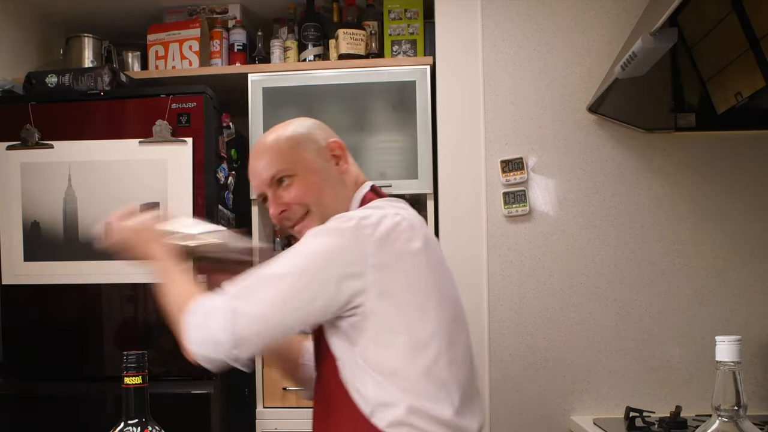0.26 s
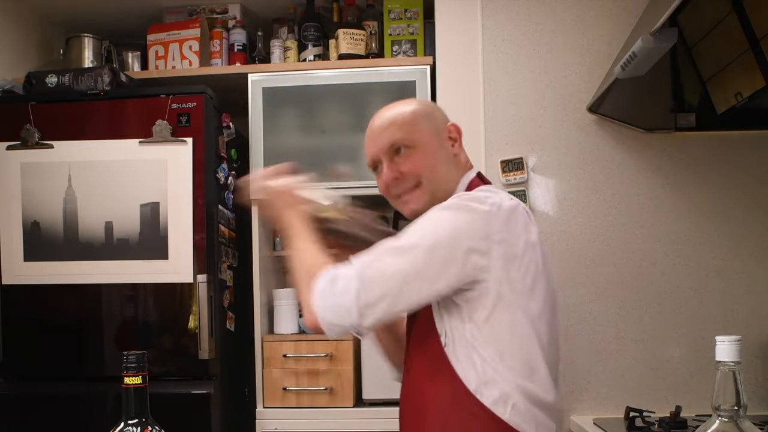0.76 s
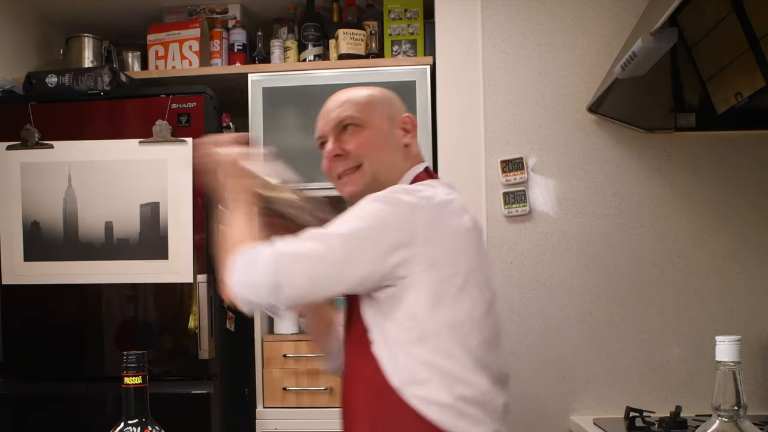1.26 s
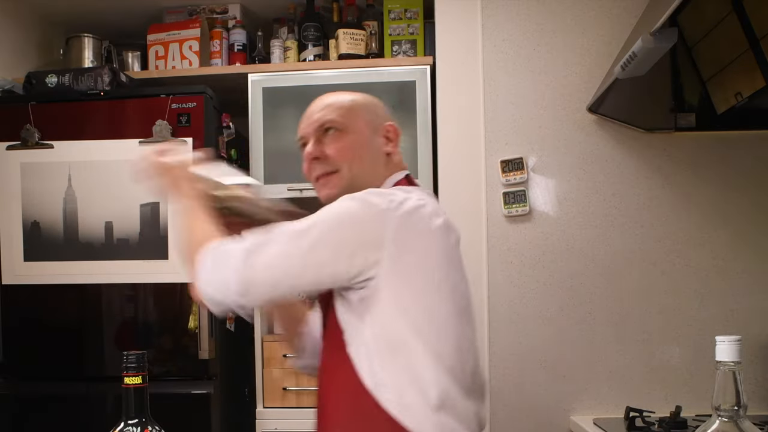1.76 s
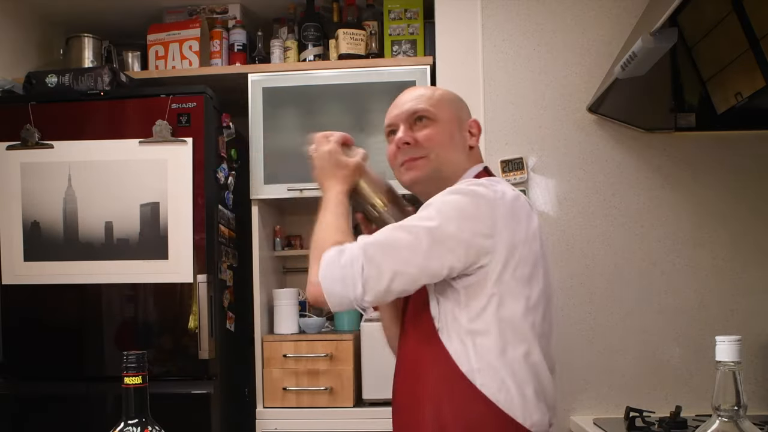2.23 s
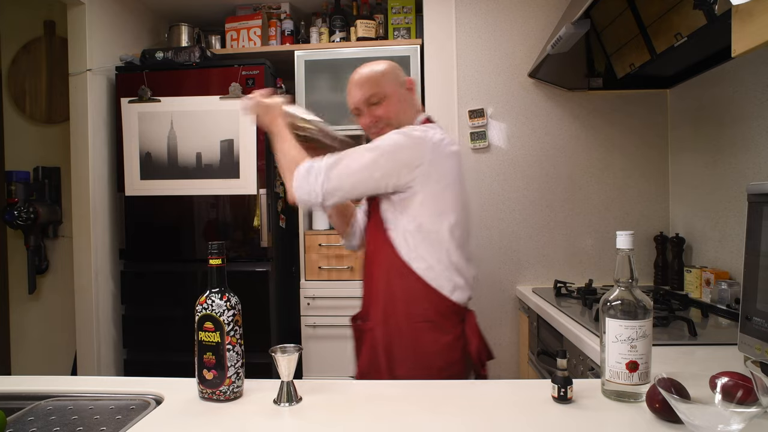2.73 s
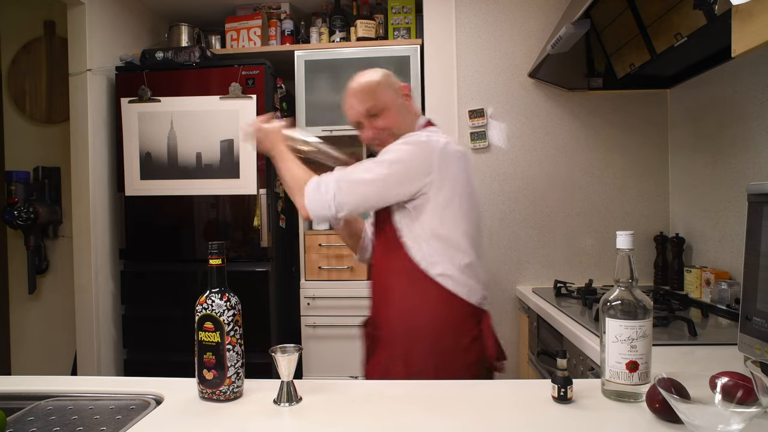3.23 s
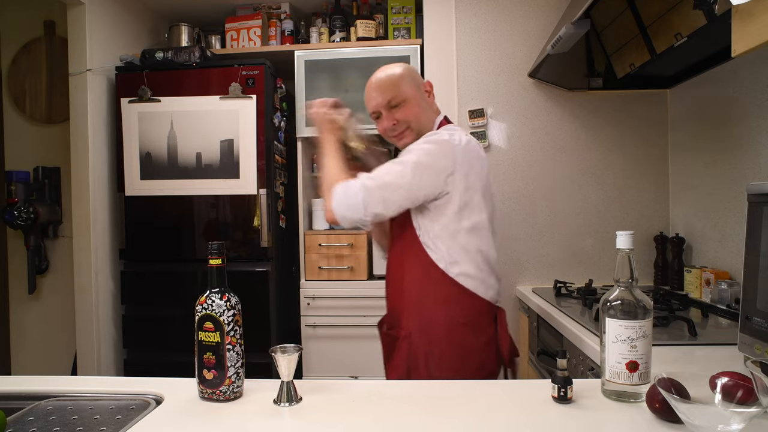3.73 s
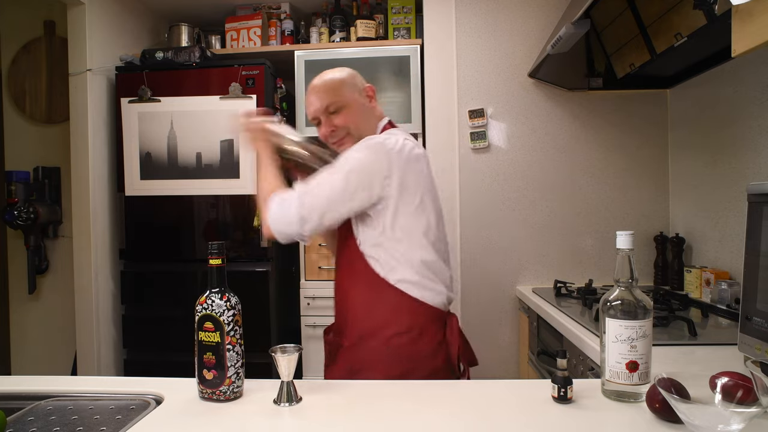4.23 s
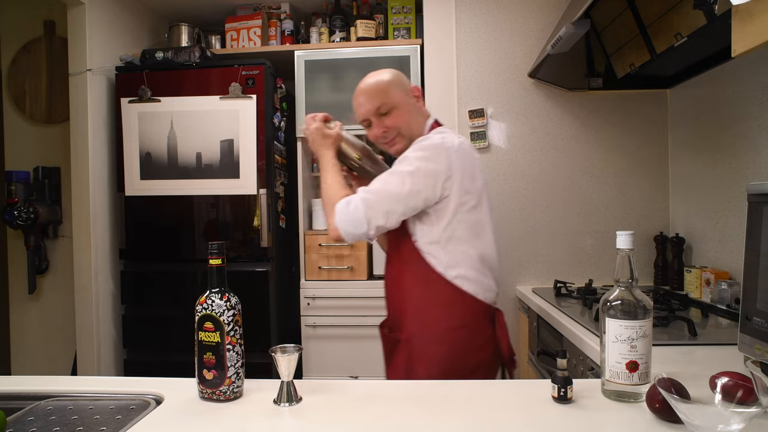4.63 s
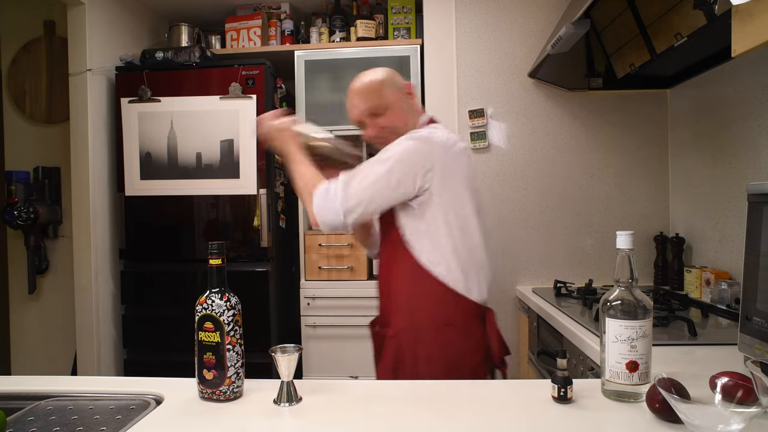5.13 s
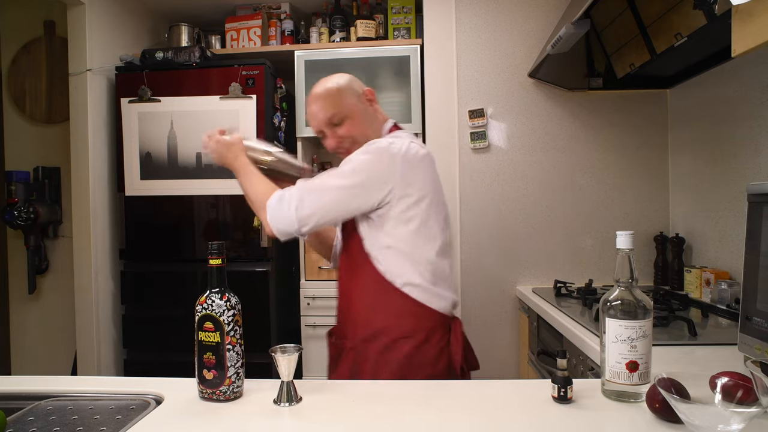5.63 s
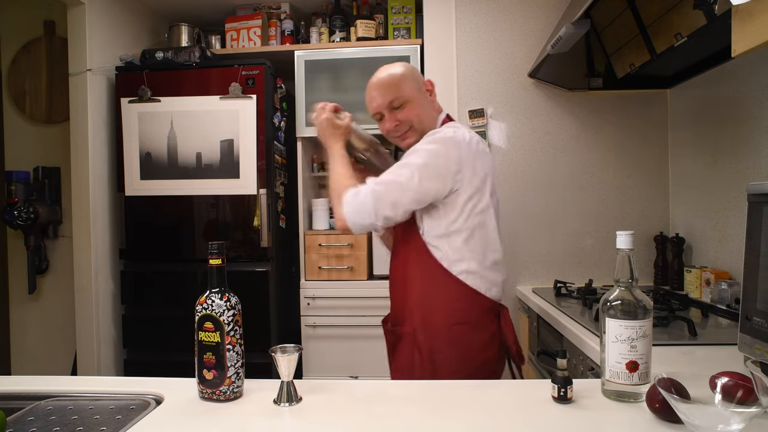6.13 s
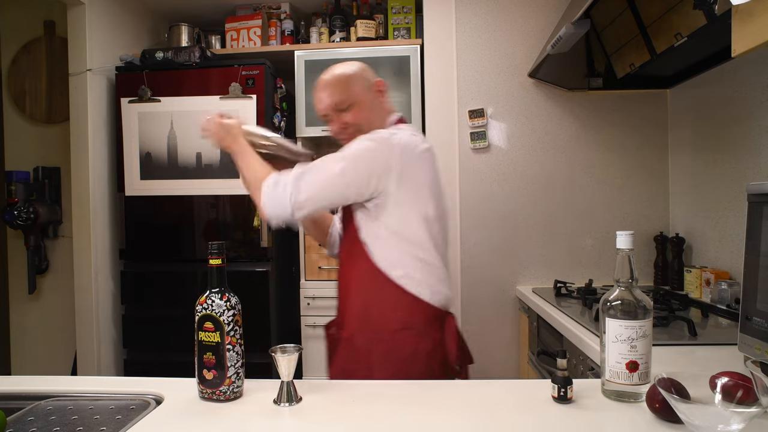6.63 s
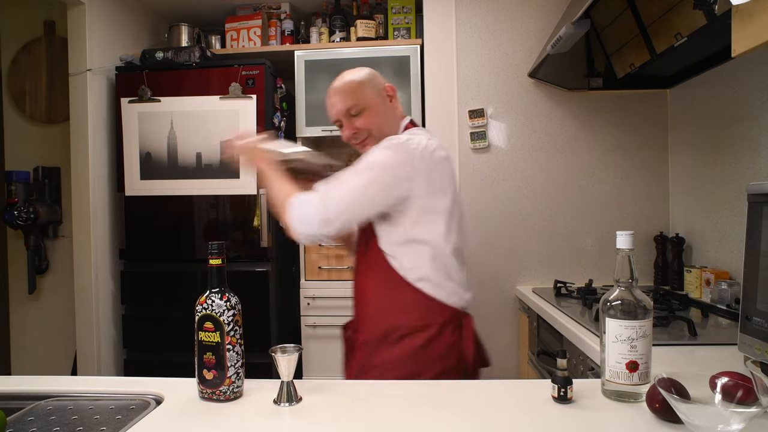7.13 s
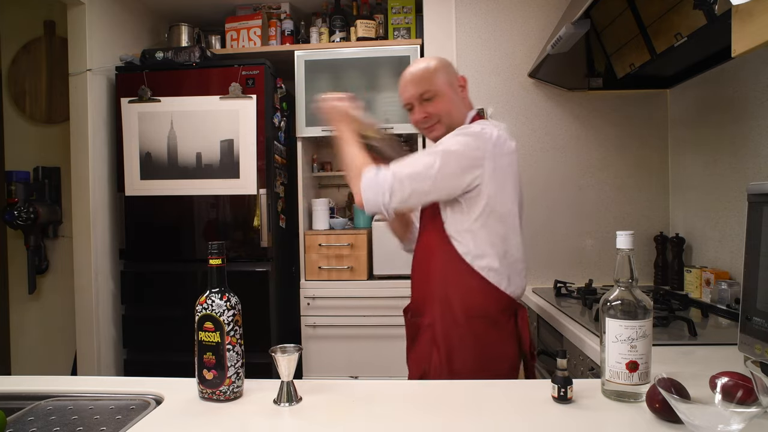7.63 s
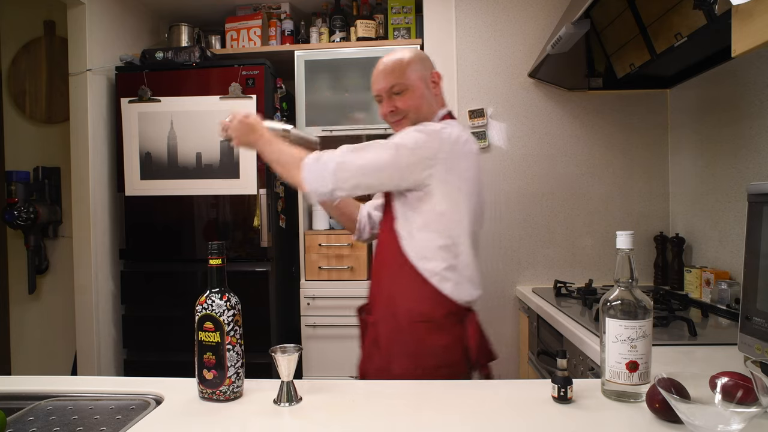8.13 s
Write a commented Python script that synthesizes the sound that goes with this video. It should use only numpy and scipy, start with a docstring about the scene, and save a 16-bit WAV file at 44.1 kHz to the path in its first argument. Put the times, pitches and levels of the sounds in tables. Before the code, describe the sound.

Rapid metallic ice rattle begins at once with a sharp knock. Cubes and liquid crash from end to end of a steel tin in a dense, steady rhythm, with bright cracks, short rings and small wet gurgles. Later the strokes grow lighter, drier and irregular, then slower, and the sound cuts off. Fairly close microphone, loud and slightly saturated, small kitchen with a brief reverberation and faint low room noise.

```python
"""A small kitchen: a steel cocktail shaker full of ice and liquid is shaken hard, slowing near the end.
About ten times a second the pack of cubes slams into one end of the tin: grainy noise driving steel resonances.
Stray cubes crack and ring between slams; clinks and hollow gurgles are short tones, and short dull low bumps
lie under some slams. The bass is fuller early and thins towards the end. Decaying noise gives the room's
reflections, and the loudest peaks are rounded off softly at a ceiling."""
import sys
import numpy as np
from scipy import signal
from scipy.fft import rfft, irfft
from scipy.io import wavfile
from scipy.ndimage import uniform_filter1d

SR = 44100
rng = np.random.default_rng(int(sys.argv[2]) if len(sys.argv) > 2 else 0)


def store_pcm(level_fs):
    """Save levels as 16-bit WAV."""
    pcm = np.round(np.clip(level_fs, -1, 1) * 32767).astype(np.int16)
    wavfile.write(sys.argv[1], SR, np.atleast_2d(pcm).T)


N = 369116
TIME = np.arange(N) / SR  # seconds

# the ice pack reaches an end of the tin:
# (time [s], time to full force [s], relative level [dB], treble over bass [dB])
SLAMS = [(0.024, 0.011, -10.5, 7.5), (0.114, 0.017, -10.5, 1), (0.281, 0.0084, -10, -1),
         (0.373, 0.015, -15.5, -5), (0.495, 0.014, -19, 2), (0.601, 0.016, -11, -5), (0.73, 0.019, -11, -1),
         (0.824, 0.012, -5, 1.5), (0.935, 0.012, -7.5, -1.5), (1.045, 0.011, -6.0, -1),
         (1.136, 0.023, -10, -2.5), (1.242, 0.018, -11, -3), (1.343, 0.024, -9.5, -2),
         (1.451, 0.0092, -6.0, -1.5), (1.552, 0.018, -10.5, 3.5), (1.653, 0.011, -7, -5.5),
         (1.761, 0.022, -8.5, -0.5), (1.838, 0.013, -7, -2), (1.927, 0.024, -11, 1), (2.04, 0.011, -6, 1.5),
         (2.144, 0.02, -8, 0), (2.236, 0.015, -9, -1), (2.335, 0.014, -7.5, 2.5), (2.426, 0.017, -8, -1.5),
         (2.547, 0.0073, -5.5, -0.5), (2.607, 0.024, -13.5, -3), (2.713, 0.022, -9, 0),
         (2.812, 0.016, -9, -4), (2.912, 0.014, -10.0, 4), (2.987, 0.016, -12, -2),
         (3.091, 0.013, -11.5, 9), (3.177, 0.012, -11.0, -7), (3.275, 0.014, -9.5, 1),
         (3.36, 0.03, -16, -1), (3.463, 0.013, -14, 10), (3.551, 0.011, -10.5, -7),
         (3.614, 0.022, -10.5, 3), (3.74, 0.011, -9.5, -3), (3.808, 0.025, -16, 9),
         (3.921, 0.031, -13.5, 1), (4.024, 0.014, -10.0, 2), (4.109, 0.011, -10, -5.5),
         (4.18, 0.021, -13.0, 0), (4.285, 0.012, -16, -8), (4.35, 0.0078, -12, 2.5), (4.387, 0.012, -12, 2),
         (4.469, 0.0079, -10.5, -9), (4.541, 0.017, -9.5, 2.5), (4.619, 0.016, -11.5, 1),
         (4.749, 0.02, -10, -1), (4.839, 0.009, -10.5, -4), (4.935, 0.0087, -6, 5),
         (5.029, 0.011, -13.0, -8), (5.098, 0.02, -12.5, -1), (5.191, 0.023, -12.5, 0.5),
         (5.297, 0.02, -14, 11), (5.399, 0.0081, -11.5, -9), (5.578, 0.016, -15, -5),
         (5.685, 0.007, -12, -3), (5.775, 0.03, -26, 6), (5.864, 0.0085, -10, -2), (6.056, 0.0064, -9.5, 4),
         (6.124, 0.0075, -12, -5), (6.235, 0.013, -9.5, 2), (6.342, 0.029, -15.5, -1),
         (6.412, 0.018, -12, 3), (6.515, 0.016, -12.0, 0), (6.609, 0.026, -12.5, 3.5),
         (6.714, 0.013, -11.5, -4), (6.83, 0.019, -13, 4.5), (6.935, 0.012, -9.5, 0.5),
         (7.069, 0.019, -11, -2), (7.158, 0.029, -12, -4.5), (7.32, 0.016, -11, -3.5),
         (7.462, 0.018, -7, -3.5), (7.614, 0.036, -14, -2), (7.815, 0.024, -11.5, -3.5),
         (7.982, 0.038, -18, 3), (8.047, 0.012, -10.5, -3.5), (8.242, 0.023, -13.5, -2.5)]
# resonances of the filled tin: (frequency [Hz], width [Hz], lift in power over the broad colour [dB])
TIN_MODES = [(282, 31, 8), (401.5, 11, 7), (470, 9.1, 1.5), (626, 10, 2.5), (666, 40, 2.5), (838, 51, -1),
             (1380, 160, 2), (1401, 30, 4), (1466, 40, 0), (1890, 24, 4), (2732, 97, 5.5), (2910, 140, 5),
             (3250, 51, 5), (3390, 104, 4.5), (4900, 380, 1.5), (6000, 250, 1)]


def from_db(db):
    """Decibels to gain."""
    return 10 ** (np.asarray(db) / 20)


def at_hz(points, hz):
    """Read a table on a log-frequency axis."""
    f, value = np.transpose(points)
    return np.interp(np.log(np.maximum(hz, 1)), np.log(f), value)


def at_time(points):
    """Draw a (time, level) table as a line over the whole scene."""
    return np.interp(TIME, *np.transpose(points))


def band(x, low, high):
    """Gentle causal band-pass."""
    sos = signal.butter(2, [low, high], "band", fs=SR, output="sos")
    return signal.sosfilt(sos, x + 1e-18)


def add(track, s, sound):
    """Mix a sound into a track from time s on."""
    start = int(np.clip(s * SR, 0, N - 1))
    track[..., start:start + sound.shape[-1]] += sound[..., :N - start]


def shaped(x, spectrum, modes=(), size=8192):
    """Causal (minimum-phase) filter: a broad spectrum with ringing resonances on top."""
    hz = np.arange(size // 2 + 1) * SR / size
    lift = 1
    for f, width, db in modes:
        lift = lift + (from_db(db) ** 2 - 1) / (1 + (2 * (hz - f) / width) ** 2)
    magnitude = from_db(at_hz(spectrum, hz)) * np.sqrt(np.maximum(lift, .1))
    # folding the cepstrum forward makes the filter minimum-phase
    cepstrum = irfft(np.log(magnitude))
    cepstrum[1:size // 2] *= 2
    cepstrum[size // 2 + 1:] = 0
    impulse = irfft(np.exp(rfft(cepstrum)))
    return signal.oaconvolve(x, impulse)[:N]


def swell(t, rise_s, attack=1, fall=1):
    """Rises to 1 in rise_s, then dies away; a small attack starts abruptly, a large fall ends quickly."""
    u = t / max(rise_s, 1e-3)
    return (u * np.exp((1 - u ** fall) / fall)) ** attack


def tone(hz, rise_s, glide=0):
    """A short ring that swells, dies and may glide in pitch (share of the pitch per s)."""
    t = TIME[:SR // 6]
    return swell(t, rise_s) * np.sin(2 * np.pi * hz * (t + glide * t ** 2 / 2))


def partials(hz, spread, t, count):
    """A few close, beating partials around one pitch; rms 1."""
    detune = spread * np.linspace(-1, 1, count) * rng.uniform(0.3, 1, count)
    cycles = np.outer(hz * (1 + detune), t) + rng.random()
    return np.sin(2 * np.pi * cycles).sum(axis=0) * np.sqrt(2 / count)


def room_noise(level_db):
    """Faint low noise of the room, independent left and right."""
    return from_db(level_db) * band(rng.standard_normal((2, N)), 23, 210)


def pack_power(attack, fall):
    """Power of the slosh and of the crunch: every slam swells and dies over the loose tumbling."""
    # cubes tumbling between the slams: (time [s], relative level [dB])
    tumble_levels = [(0.0, -18), (0.22, -26), (0.33, -20.5), (0.69, -21.5), (1.3, -18.5), (3.0, -16.5),
                     (4.0, -19), (5.0, -15), (6.9, -17.5), (7.4, -22), (7.95, -28), (8.37, -26)]
    lift_db, lead_s, lift_s = 1, 0.028, np.pi * 0.014  # the tumbling swells slightly around each slam
    lift, slams = np.zeros(N), np.zeros((2, N))
    for s, rise_s, db, tilt_db in SLAMS:
        gains = from_db([db - tilt_db / 2, db + tilt_db / 2])  # slosh, crunch
        force = swell(TIME[:SR // 4], rise_s, attack, fall)
        add(slams, s, np.outer(gains, force) ** 2)
        add(lift, s - lead_s, np.hanning(int(lift_s * SR)))
    tumbling = from_db(at_time(tumble_levels) + lift_db * lift) ** 2
    return slams + tumbling


def contacts(per_s, spread_db, contact_s, share_s, grit):
    """Power of many brief cube contacts, mean near 1; cubes that land together share the pack's momentum."""
    strength = from_db(spread_db * rng.standard_normal(N)) ** 2
    hits = (rng.random(N) < per_s / SR) * strength
    keep = np.exp(-1 / (contact_s * SR))
    power = signal.lfilter([1 - keep], [1, -keep], hits + 1e-9)
    power /= np.maximum(uniform_filter1d(power, int(share_s * SR)), 1e-9)
    return (power + grit) / (1 + grit)  # grit is a steady share under the single contacts


def strike_points(spread_db, hold_s):
    """Cubes land on ever new spots, so each group of modes is driven by a changing share; rms near 1."""
    draws = rng.standard_normal(N // 32)
    gain = from_db(spread_db * np.clip(draws, -2, 2))
    gain = gain / np.sqrt(np.mean(gain ** 2))
    return np.interp(TIME / hold_s, np.arange(len(gain)), gain)


def excitation(pack, cracks, grain, treble_hz, hardening):
    """Contact forces as noise in narrow bands, mid and side, following the power of pack and cracks."""
    # a slam's tilt runs from the hollow slosh up to the crunch of the ice: pitch of each [Hz]
    register_hz = [1000, 4500]
    edges = np.r_[40, np.geomspace(450, 19000, 16)]  # Hz
    white = rng.standard_normal((2, 2, N))  # neighbouring bands take turns between two mid/side pairs
    drive = 0
    # harder contacts are shorter, so they reach further into the treble
    crunch = pack[-1]
    hardness = np.minimum(crunch / crunch.mean(), 4) ** hardening
    for k, (low, high) in enumerate(zip(edges, edges[1:])):
        hz = np.sqrt(low * high)
        treble = hz > treble_hz
        shares = np.array([at_hz(list(zip(register_hz, row)), hz) for row in np.eye(len(register_hz))])
        power = shares @ pack * grain * (hardness if treble else 1) + cracks
        # the dense treble modes depend less on where a cube lands
        spots = strike_points(spread_db=1.5 if treble else 3.2, hold_s=.007)
        drive = drive + band(np.sqrt(power) * spots * white[k % 2], low, high)
    return drive


def with_bass(x, bass_hz):
    """The bass is fuller early and thins towards the end: a low-passed copy is mixed in or taken out."""
    # fullness of the bass: (time [s], gain of the bass [dB])
    bass_levels = [(0, 10), (1.5, 4.5), (3.5, 6.5), (5.5, 1), (6.8, 0.5), (8.3, -7.5)]
    bass = signal.sosfilt(signal.butter(1, bass_hz, fs=SR, output="sos"), x)
    return x + bass * (from_db(at_time(bass_levels)) - 1)


def tin(drive, count=3):
    """The steel's resonances shift at random as more or less liquid lies against the wall."""
    # broad colour of ice on steel: (frequency [Hz], level [dB])
    steel_colour = [(40, -30), (75, -31), (130, -25), (200, -24), (340, -20), (520, -8.5), (720, -3),
                    (1100, 1), (1350, 3.5), (2200, 0.5), (3100, 2), (3900, -2), (5300, 3), (7800, -6),
                    (10800, -7.5), (13500, -17), (15500, -35.5)]
    swing, hold_s = 0.012, 0.08  # shift either way (share of pitch), time between draws (s)
    load = rng.integers(0, count, N // 64)[(TIME / hold_s).astype(int)]
    out = 0
    for k, shift in enumerate(1 + swing * np.linspace(-1, 1, count)):
        modes = [(hz * shift, width, db) for hz, width, db in TIN_MODES]
        # only new blows meet the new load; earlier rings die at their own pitch
        out = out + np.array([shaped(d * (load == k), steel_colour, modes) for d in drive])
    return out


def shaker(pack_db, knock_db):
    """Contacts drive the tin with independent mid and side noise; rings and tones join the mid."""
    # the loudest single cubes hit the steel: (time [s], relative level [dB], ring [Hz])
    loud_knocks = [(0.0315, 0.5, 2920), (0.0462, -11, 3100), (0.1275, -1, 9130), (0.272, -6, 5160),
                   (0.2935, -11, 1410), (0.3015, -8, 2900), (0.338, -14, 4940), (0.354, -10, 3030),
                   (0.4506, -6, 3070), (0.4987, -3, 5010), (0.5173, -1.5, 3250), (0.568, -8, 2350),
                   (0.59, -14, 5700), (0.6053, 0.5, 2890), (0.7338, -0.5, 9100), (0.7574, -5.5, 1380),
                   (0.8282, -15, 2800), (0.9283, -15, 3080), (0.9451, -5, 3060), (1.0497, 0.5, 3100),
                   (1.0702, 0.5, 1370), (1.1415, 3, 2710), (1.2576, -0.5, 3320), (1.2723, 2.5, 1436),
                   (1.3478, -5.5, 3110), (1.405, -5, 1400), (1.4536, -5, 1390), (1.4752, -1.5, 1415),
                   (1.527, -9, 2900), (1.5581, -4, 3480), (1.6424, -10, 2610), (1.8076, -3.5, 2220),
                   (1.8688, -1, 2960), (1.9631, 1.5, 2580), (2.149, -1, 3170), (2.241, -2.5, 4580),
                   (2.3375, -6, 4940), (2.429, -6, 1300), (2.5475, -9, 1330), (2.6255, -5, 3100),
                   (2.6657, -4, 2970), (2.847, -4, 3020), (2.9158, -8, 1410), (2.9435, -3, 1440),
                   (2.9916, -2, 2800), (3.0944, -1, 2750), (3.3687, -2.5, 3310), (3.3833, -5, 3340),
                   (3.4351, -3, 2630), (3.4682, 1, 5830), (3.5694, -0.5, 2790), (3.6716, -1, 1470),
                   (3.7595, -7, 2010), (3.791, -3, 3200), (3.811, -6, 5800), (3.8345, 1, 5180),
                   (3.8542, 1.5, 5270), (3.9542, -2, 3380), (3.9929, -3.5, 2770), (4.0308, -5, 2110),
                   (4.116, -4, 2780), (4.1568, -2.5, 2880), (4.2178, -4.5, 2940), (4.575, -1, 5460),
                   (4.9068, -3.5, 2630), (5.1055, -6, 3270), (5.3125, -4, 2800), (5.508, -4, 2900),
                   (5.6497, -6, 5500), (5.787, -5, 2730), (5.819, -1, 2225), (6.0133, -3, 4880),
                   (6.1275, -1, 2830), (6.2522, -8, 1450), (6.5202, -4, 4830), (6.6145, -4, 3370),
                   (6.6466, 0, 4720), (6.7323, -5, 1590), (6.8358, -4, 3030), (6.8672, -5.5, 4880),
                   (7.164, -8, 2850), (7.2115, -8, 1940), (7.294, -9, 1385), (7.339, -7, 5200),
                   (7.3641, -5.5, 3300), (7.428, -5, 2890), (7.5891, -6.5, 3280), (7.678, -11, 1400),
                   (7.8556, -6.5, 3120), (8.0663, 0.5, 4990)]
    pack = from_db(pack_db) ** 2 * pack_power(attack=0.32, fall=1.735)
    grain = contacts(per_s=600, spread_db=2.0, contact_s=0.00038, share_s=0.0129, grit=1.0)
    singing = clinks(level_db=12, light_db=-15, scatter_db=8.5, rise_s=0.0053, above_hz=1100, detune=0.049)
    hollow = gurgles(gulp_db=10, gulp_rise_s=0.0068, level_db=-16.5, low_hz=560, high_hz=1030,
                     rise_s=0.0048, glide=2.9)
    cracks, rings = knocks(list(loud_knocks) + strays(pack[-1]), crack_s=0.00048, chip_s=0.006,
                           chip_db=-6.0, ring_t60=0.06, ring_db=-7.0, spread=0.0534)
    cracks = from_db(knock_db) ** 2 * cracks
    drive = excitation(pack, cracks, grain, treble_hz=7000, hardening=0.1)
    mid, side = tin(with_bass(drive, bass_hz=460))
    return np.array([mid + rings + singing + hollow, side])


def kitchen(x, wet_db, first_s):
    """Diffuse reflections from cupboards and walls as decaying noise, dying soonest in the middle range."""
    # kitchen reverberation: (frequency [Hz], time to fall by 60 dB [s])
    decay_times = [(200, 0.46), (1400, 0.17), (5000, 0.17), (14000, 0.44)]
    t, edges = TIME[:SR // 2], np.geomspace(60, 18000, 9)
    tail = 0
    for low, high in zip(edges, edges[1:]):
        t60 = at_hz(decay_times, np.sqrt(low * high))
        tail = tail + band(rng.standard_normal((2, len(t))), low, high) * from_db(-60 * t / t60)
    tail = tail * np.clip(t / first_s - 1, 0, 1)  # silent until first_s, full at twice that
    tail /= np.sqrt(np.sum(tail ** 2, axis=1, keepdims=True))
    return from_db(wet_db) * signal.oaconvolve(x, tail, axes=1)[:, :N]


def clinks(level_db, light_db, scatter_db, rise_s, above_hz, detune, count=2):
    """Clear clinks, and lighter ones that each slam draws from the tin's upper resonances."""
    # the clearest clinks, where a cube or the steel sings on: (time [s], relative level [dB], pitch [Hz])
    clear_clinks = [(1.237, -19.5, 1396), (1.465, -15.5, 1397), (1.838, -20, 1905), (1.948, -19, 3410),
                    (2.34, -17, 5060), (2.547, -16.5, 1323), (3.753, -18.5, 1886), (4.851, -24, 1915),
                    (5.039, -20.5, 1893), (5.186, -23, 7350), (6.158, -27, 1850), (6.243, -17, 1396),
                    (6.938, -24, 1900), (7.814, -26, 1970), (8.266, -25.5, 1950)]
    out = np.zeros(N)
    pitches = [hz for hz, *_ in TIN_MODES if hz > above_hz]
    for s, db, hz in clear_clinks:
        add(out, s, from_db(db + level_db) * tone(hz, rise_s))
    for (s, slam_s, db, _), draws in zip(SLAMS, rng.random((len(SLAMS), count, 4))):
        for late, mode, force, load in draws:
            hz = pitches[int(mode * len(pitches))] * (1 + detune * (load - .5))
            gain = from_db(db + light_db + scatter_db * (2 * force - 1))
            add(out, s + 2 * late * slam_s, gain * tone(hz, rise_s))
    return out


def gurgles(gulp_db, gulp_rise_s, level_db, low_hz, high_hz, rise_s, glide, count=3):
    """Each slosh traps air pockets that ring hollowly while squeezed; the slow last strokes give longer gulps."""
    # hollow gulps as the shaking slows:
    # (time [s], relative level [dB], starting pitch [Hz], glide [share of the pitch per s])
    late_gulps = [(6.935, -27, 823, -1), (7.09, -33, 540, -3.5), (7.161, -31, 722, -1.5),
                  (7.196, -26, 1003, -3), (7.497, -26, 735, -0.5), (7.672, -29.5, 613, 5.5),
                  (7.83, -32, 725, -0.5), (8.252, -28, 665, 1.5)]
    out = np.zeros(N)
    for s, db, hz, slide in late_gulps:
        add(out, s, from_db(db + gulp_db) * tone(hz, gulp_rise_s, slide))
    for (s, slam_s, db, tilt_db), draws in zip(SLAMS, rng.random((len(SLAMS), count, 3))):
        gain = from_db(db - tilt_db / 2 + level_db)
        for late, size, squeeze in draws:
            hz = low_hz * (high_hz / low_hz) ** size
            pocket = tone(hz, rise_s, glide * (2 * squeeze - 1))
            add(out, s + 2 * late * slam_s, gain * pocket)
    return out


def knocks(rows, crack_s, chip_s, chip_db, ring_t60, ring_db, spread):
    """A cube cracks against the steel, chips, and leaves that spot ringing; gives crack power and ring."""
    ring_limit_hz = 7200  # a ring is halved at this pitch and soon vanishes above it
    power, rings, t = np.zeros(N), np.zeros(N), TIME[:SR // 10]
    for s, db, hz in rows:
        chips = from_db(chip_db) ** 2 * np.exp(-t / chip_s)
        add(power, s, from_db(db) ** 2 * (np.exp(-t / crack_s) + chips))
        gain = from_db(db + ring_db - 60 * t / ring_t60) / (1 + (hz / ring_limit_hz) ** 6)
        add(rings, s, gain * partials(hz, spread, t, count=3))
    return power, rings


def strays(crunch, size=160):
    """Lighter cubes knock at random, as strong as the pack's motion allows: rows like the loud knocks."""
    per_s, over_pack_db, scatter_db = 7.0, 1.5, 0.5
    low_hz, high_hz = 2195, 6070  # range of ring pitches
    rows = []
    for when, chance, force, spot in rng.random((size, 4)):
        if chance < per_s * N / SR / size:
            pack_db = 10 * np.log10(crunch[int(when * N)])
            db = pack_db + over_pack_db + scatter_db * (2 * force - 1)
            rows.append((when * N / SR, db, low_hz * (high_hz / low_hz) ** spot))
    return rows


def low_bumps(length_s, level_db):
    """Short dull low bumps under some slams: brief swells of low noise."""
    # the bumps: (time [s], relative level [dB])
    bump_levels = [(1.049, -34), (1.139, -27), (2.038, -32), (2.439, -13), (3.669, -28), (4.939, -40),
                   (6.129, -26), (6.249, -3)]
    envelope = np.zeros(N)
    for s, db in bump_levels:
        add(envelope, s, from_db(db + level_db) * swell(TIME[:SR // 10], length_s))
    return band(envelope * rng.standard_normal(N), 35, 184)


def scene():
    """Shaker and its reflections, mostly a little left of centre, over a faint low room noise."""
    # width of the sound: (frequency [Hz], gain of the side signal [dB])
    side_gain = [(100, -4), (350, -6.5), (700, -7.5), (1400, -8), (2400, -6), (5500, -7), (7800, -1.5),
                 (10500, -1), (13000, 3.3), (15000, 10)]
    # lean to the left: (frequency [Hz], left minus right [dB])
    left_lean = [(100, 4.5), (550, 2.5), (900, 0.9), (1800, 0.9), (2300, 2.5), (4000, 1.1), (6000, 1.5),
                 (10300, -0.9), (13000, 1.2)]
    dry_shaker = shaker(pack_db=3.0, knock_db=1.5)
    mid, side = dry_shaker + kitchen(dry_shaker, wet_db=-9.5, first_s=0.0022)
    mid = mid + low_bumps(length_s=0.003, level_db=-6.0)
    # the two microphone ports agree in the middle range and differ in the treble
    side = shaped(side, side_gain)
    left = shaped(mid + side, [(hz, db / 2) for hz, db in left_lean])
    right = shaped(mid - side, [(hz, -db / 2) for hz, db in left_lean])
    return np.array([left, right]) + room_noise(level_db=-34)


def rounded_peaks(x, top, knee):
    """The loudest peaks are rounded off softly at a ceiling."""
    return x / (1 + np.abs(x / top) ** knee) ** (1 / knee)


def record(dry):
    """The loudest peaks are rounded off softly; the top is cut steeply."""
    cutoff_hz = 15600
    top_cut = signal.ellip(10, .1, 70, cutoff_hz, fs=SR, output="sos")
    return signal.sosfilt(top_cut, rounded_peaks(dry, top=1.12, knee=2.19))


dry = scene()
out = record(dry)
store_pcm(out)
```